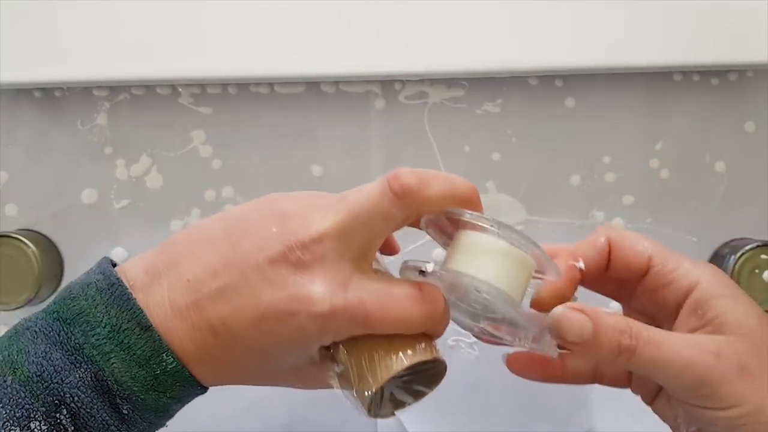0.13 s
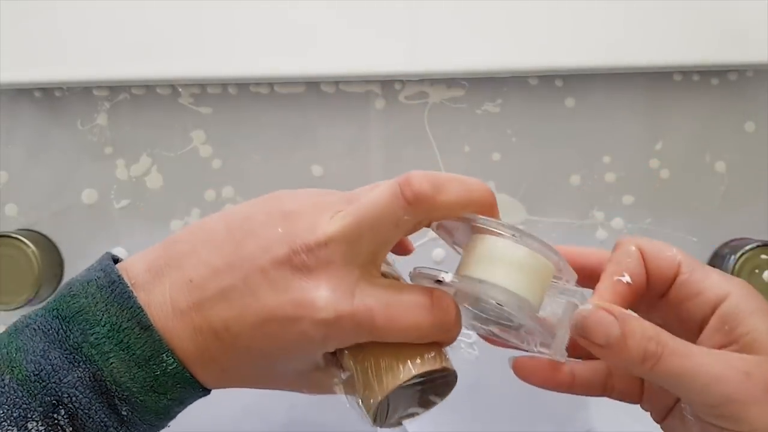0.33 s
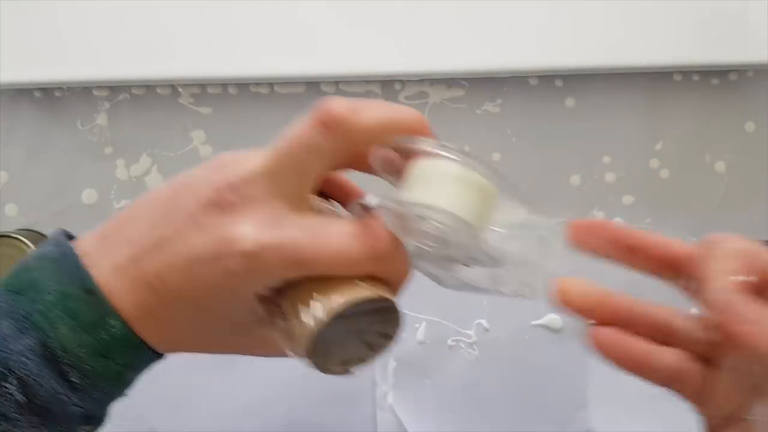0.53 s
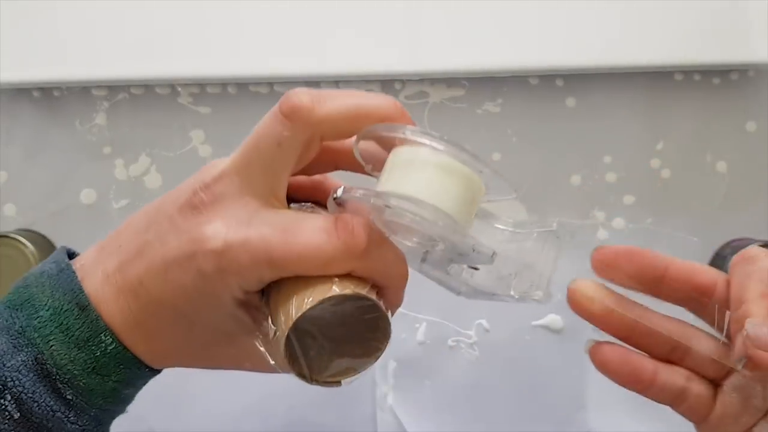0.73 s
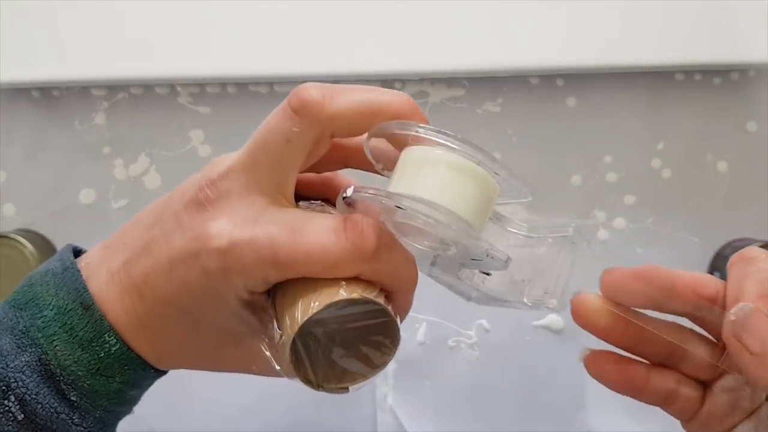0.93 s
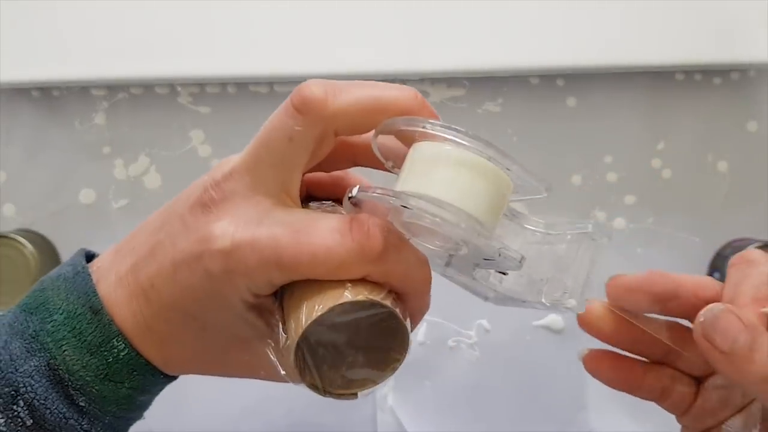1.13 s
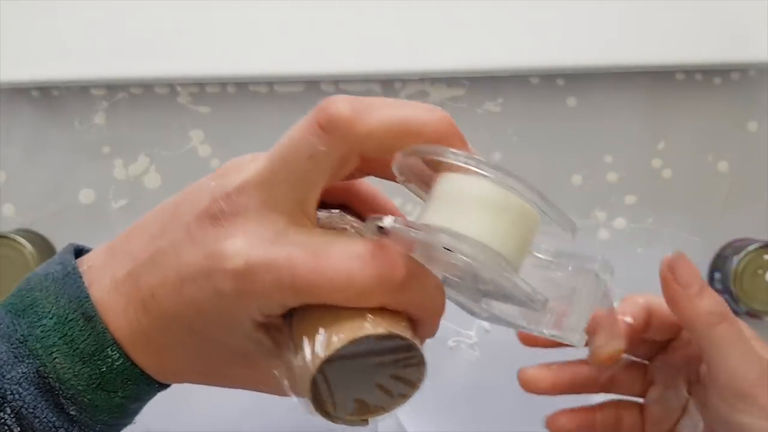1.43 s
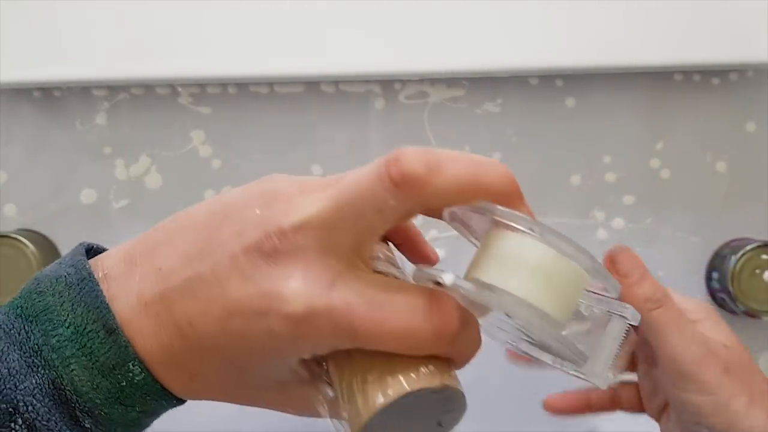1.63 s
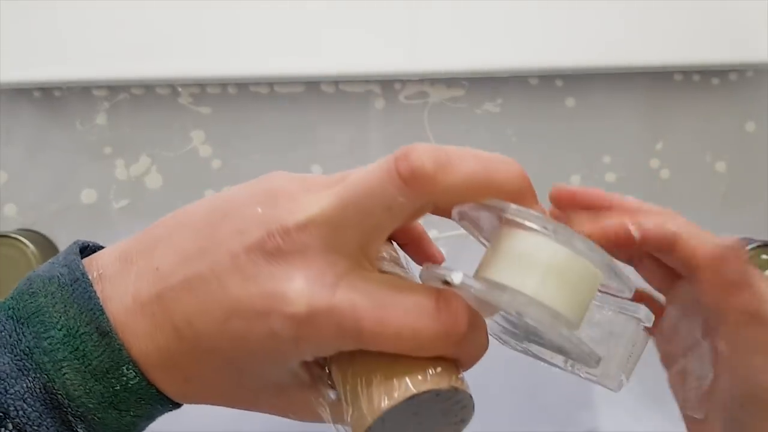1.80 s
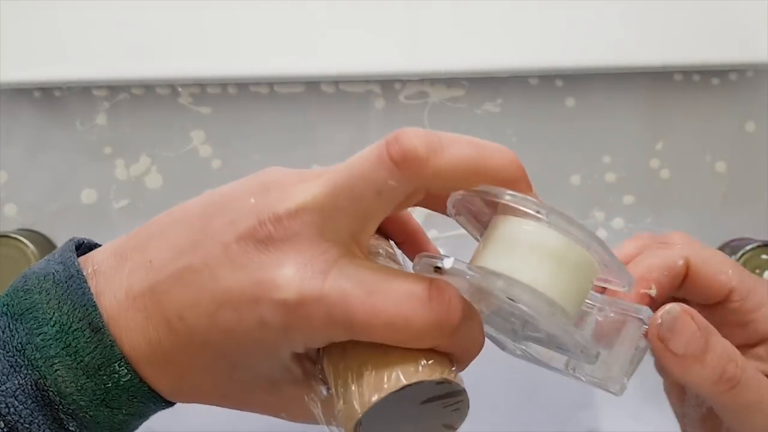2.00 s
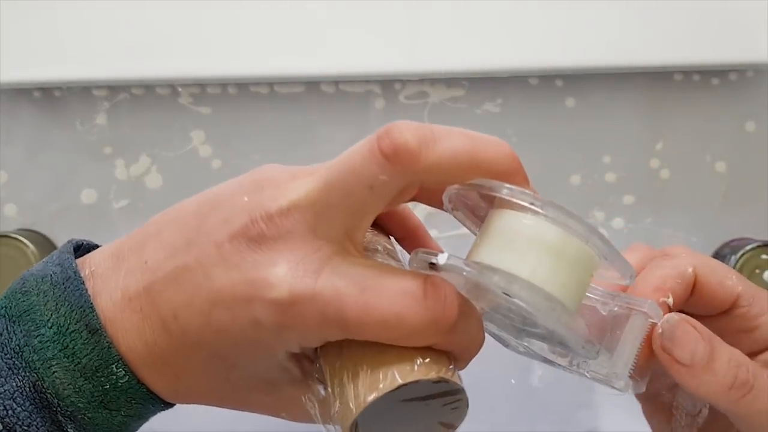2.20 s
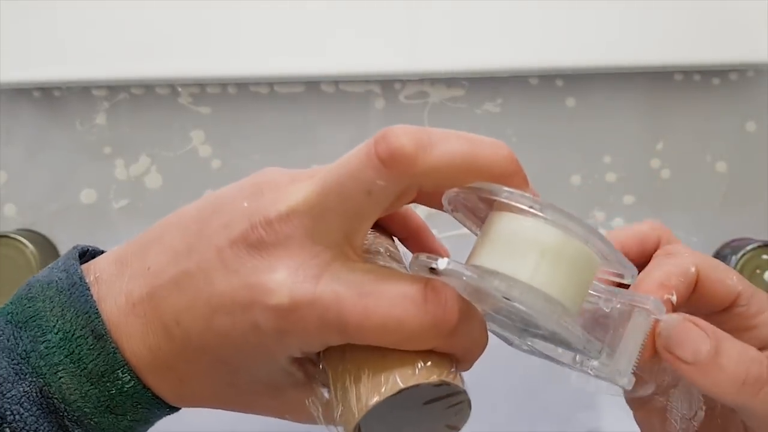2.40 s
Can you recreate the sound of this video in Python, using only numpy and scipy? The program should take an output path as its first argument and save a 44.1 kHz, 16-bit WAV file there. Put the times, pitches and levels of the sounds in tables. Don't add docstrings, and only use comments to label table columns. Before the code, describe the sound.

A bright, ringing rip of adhesive tape follows faint finger rubs and crisp clicks; afterwards only sparse light ticks, soft rubs and tiny squeaks remain. Close stereo phone microphone, stronger on the right, short indoor echo.

```python
import sys
import numpy as np
from scipy import signal
from scipy.fft import rfft, irfft, next_fast_len
from scipy.io import wavfile
from scipy.ndimage import map_coordinates

SR = 44100
rng = np.random.default_rng(int(sys.argv[2]) if len(sys.argv) > 2 else 0)


def unload_audio(sound):
    columns = np.transpose(np.atleast_2d(sound))
    steps = np.round(np.clip(columns, -1, 1) * 32767)
    wavfile.write(sys.argv[1], SR, steps.astype(np.int16))


def convert_level_to_amplitude(level_db):
    exponent = np.asarray(level_db, float) / 20
    return 10 ** exponent


N = 112454

# pitch in Hz, width in Hz, level in dB.
HUM_LINES = [(113.2, 18, -70.5), (155, 40, -74), (233, 29, -84), (310, 71, -83.5)]
# time in seconds, level in dB.
HUM_LOAD = [(0.0, -68.5), (0.07, -54), (0.11, -67), (0.15, -55.5), (0.93, -64.5), (0.96, -55.5),
            (1.66, -73.5), (1.7, -64.5), (1.77, -72.5), (1.81, -62), (1.92, -70.5), (1.95, -64.5),
            (2.01, -72), (2.04, -61), (2.24, -56), (2.27, -70), (2.31, -56), (2.55, -60.5)]
# frequency in Hz, density in dB per Hz.
RUMBLE_COLOUR = [(25, -11), (60, 4.5), (200, -15.5), (400, -21), (1000, -28.5), (2500, -39.5)]
# centre in seconds, level
# in dB, pitch in Hz, length in seconds.
BUMPS = [
    (0.006, -67, 300, 0.052),
    (0.247, -54, 130.4, 0.052),
    (0.781, -61.5, 203.3, 0.025),
    (1.44, -62, 155, 0.038),
    (2.297, -74.5, 300, 0.063),
    (2.435, -66.5, 310, 0.11),
]
# frequency in Hz, density in dB per Hz.
HISS_COLOUR = [(400, -28.5), (700, -11), (1500, -16.5), (3000, -17), (5000, -18), (8000, -24), (11000, -17),
               (16000, -11.5)]
# time in seconds, level in dB.
HISS_GAIN = [(0.7, -69), (0.818, -81), (0.992, -79), (1.42, -72.5), (1.678, -75.5), (2.254, -74),
             (2.55, -71)]
# start in seconds, length in seconds, level in dB, brightness in dB, shell ring in dB.
RUBS = [
    (-.03, 0.096, -59.5, -6, -26.5),
    (0.079, 0.16, -58, -2, -26),
    (0.788, 0.084, -70.5, -8, -8),
    (1.038, 0.084, -74, 3, 9.5),
    (1.101, 0.051, -73, 10, -15),
    (1.163, 0.097, -70, 4.5, -5),
    (1.269, 0.083, -58, -12.5, 8),
    (1.501, .085, -61.5, 6.5, 1.5),
    (1.919, 0.11, -68.5, -12, 0),
    (2.255, 0.175, -67, -5, 5),
]
# start in seconds, peak in dB, brightness in dB, shell ring in dB, burst length in seconds.
PICKS = [(0.0003, -55, 2, 8, 0.0015), (0.0504, -53.5, 1, -36, 0.00147), (0.094, -53.5, 8, -25, 0.0016),
         (0.106, -56, 6, -23, 0.001), (0.11, -60, 10, -22.5, .001), (0.13, -60, 12.5, -17.5, 0.00084),
         (0.144, -43.5, 7, -31, 0.00069), (0.1616, -36, 0, -28.5, 0.0032), (0.182, -39.5, 5.5, -20.5, .001),
         (0.186, -33, 0.5, -15.5, 0.002), (0.1904, -25, 0.5, 11.5, 0.003), (0.1939, -25.5, -0.5, 7, 0.002),
         (0.1986, -32.5, -2.5, 12.5, .003), (.208, -38, -3, 10.5, .002), (0.225, -42, -6, 9.5, .002),
         (0.2329, -38.5, 2.5, -10, .002), (0.2354, -14, 1.5, -5, 0.0028), (0.3416, -55.5, -5.5, 8, .004),
         (0.3986, -40, 0.5, -10, .002), (0.4, -13.5, -1, -3.5, 0.0032), (0.4143, -15, 4, -3, 0.0045),
         (0.4245, -19, 2, -1, 0.0017), (.428, -15.5, 3.5, -2, .004)]
# start in seconds, peak in dB, brightness in dB, shell ring in dB, burst length in seconds.
TICKS = [(0.7771, -47.5, 2, -6, 0.0013), (.842, -65, -10, -6, .001), (1.0498, -54.5, 4, -3, 0.0011),
         (1.0797, -56.5, 8, -18, 0.00092), (1.0896, -57, -12, -23, 0.0012), (1.2686, -41, -4, 13.5, 0.0018),
         (1.3298, -51, 3, -13, .0007), (1.4554, -65.5, 6, -4.5, 0.0011), (1.5645, -38, 9.5, 11.5, .001),
         (1.9184, -57.5, -21, 9.5, 0.0029), (2.146, -79, -5.5, 10.5, .002), (2.4636, -72, 16, -23, .001),
         (2.4803, -45.5, 16, -14.5, 0.0015)]
# frequency in Hz, density in dB per Hz.
TAPE_COLOUR = [(1500, -42), (2600, -11.5), (3300, -4.5), (5000, -7.5), (8000, -6.5), (12500, -2.5),
               (16000, -9)]
# start in seconds, level in dB, pitch in Hz, t60 in seconds.
PINGS = [(0.16, -45.5, 3300, 0.023), (0.19, -36, 8200, .015), (0.18, -40, 5750, .016),
         (.2365, -20, 8200, 0.017), (.24, -43, 8250, .17), (.236, -33, 3270, .02), (.2362, -44, 700, .15),
         (.24, -46.5, 4900, .17), (.236, -35.5, 1250, 0.024), (.3425, -54, 5800, .022),
         (.3418, -43, 1880, .06), (0.4, -25, 1250, 0.022), (.4003, -26.5, 2000, .03),
         (.4275, -25.5, 800, .03), (.43, -18.5, 7800, .012), (.527, -34, 798, 0.042),
         (1.31, -65.5, 1250, .06), (1.5645, -53, 5200, .02), (1.9184, -71, 1380, 0.041)]
# start in seconds, length in seconds, level in dB, pitch in Hz, rise in Hz per second.
SQUEAKS = [
    (2.257, .07, -75, 1520, 2500),
    (2.29, .115, -71, 1760, 200),
    (2.28, .065, -75, 7900, 3000),
    (2.315, .07, -79, 4500, 500),
    (1.515, .05, -67, 4700, 2000),
]
# time in seconds, force in dB, brightness in dB, shell ring in dB, low tug in dB, hub ring in dB.
PULL = [
    (.422, -44, -1, -3.5, -6.5, -3),
    (0.424, -15, 4, -0.5, -4, -0.5),
    (.45, -8, 4.5, -4.5, -5.5, 0),
    (0.488, -8.5, 7.5, -7.5, -6, 3),
    (.499, -8, 7.5, -13.5, -5.5, -16.5),
    (0.526, -9.5, 4, 1, -2.5, -10),
    (0.546, -8.5, 2.5, -8, 3, 3),
    (0.563, -14, 1, -0.5, 6, 2),
    (0.57, -36, 6, 7.5, -5.5, 7.5),
]
# pitch in Hz, width in Hz, level in dB.
SHELL_MODES = [(1416, 740, -18.5), (1577, 110, -11), (1762, 41, -3.5), (1933.4, 49, 1.5), (2130, 130, -7),
               (2463, 220, -15), (4610, 350, -20.5), (5250, 400, -21.5), (8200, 670, -21)]
# pitch in Hz, width in Hz, level in dB.
HUB_MODES = [(1787, 44, 15)]
# pitch in Hz, width in Hz, level in dB.
RATTLE_MODES = [(480, 250, -12), (740, 300, -8), (1250, 300, -2.5)]
# pitch in Hz, width in Hz, level in dB.
DRUM_MODES = [(226, 120, -12), (323, 120, -9)]
# frequency in Hz, likeness from 0 to 1.
NEAR_ALIKE = [(100, .95), (1800, .95), (3000, .5), (6000, .2), (15000, .1)]
# frequency in Hz, left minus right in dB.
NEAR_SIDE = [(200, -6), (1500, -9), (3000, -8.5), (5000, -15), (7000, -17.5), (9000, -2.5), (11000, -6.5),
             (15000, -10.5)]
# frequency in Hz, likeness from 0 to 1.
ROOM_ALIKE = [(200, .9), (1800, .75), (4000, .1)]
# frequency in Hz, t60 in seconds.
ROOM_T60 = [(200, 0.087), (2000, 0.29), (8000, 0.25), (15000, 0.12)]

TABLE_GAP_S, TABLE_DB, TABLE_T60 = .0055, -7.5, 0.051
ROOM_GAP_S, ROOM_DB = .008, -10.5
ECHO_LEFT_DB = -9.5


def unit(x):
    return x / np.sqrt(np.mean(x ** 2) + 1e-20)


def along(points, hz):
    f, v = np.transpose(points)
    return np.interp(np.log(hz + 1), np.log(f + 1), v)


def wobble(rate):
    knots = rng.standard_normal(int(N * rate / SR) + 4)
    return map_coordinates(knots, [np.arange(N) * rate / SR])


def faded(t, length, edge):
    return np.clip(np.minimum(t, length - t) / edge, 0, 1)


def filtered(x, response):
    m = next_fast_len(N + SR // 2)
    return irfft(rfft(x, m) * response(np.fft.rfftfreq(m, 1 / SR)), m)[..., :N]


def resonances(modes):
    def response(f):
        total = 0
        for k, (hz, width, db) in enumerate(modes):
            total = total + (-1) ** k * convert_level_to_amplitude(db) * 1j * f * width / (hz * hz - f * f + 1j * f * width)
        return total
    return response


def pair(envelope, colour, alike):
    def mid_side(hz):
        turn = np.arccos(np.clip(along(alike, hz), -1, 1)) / 2
        return colour(hz) * [np.cos(turn), np.sin(turn)]
    mid, side = filtered(envelope * rng.standard_normal((2, N)), mid_side)
    return np.array([mid + side, mid - side])


def narrow(t, hz, rise, blur):
    a, b = [map_coordinates(k, [t * blur * hz], mode="wrap") for k in rng.standard_normal((2, 400))]
    phase = 2 * np.pi * (hz + rise * t / 2) * t
    return a * np.cos(phase) + b * np.sin(phase)


def hum():
    alike = [(50, .93), (300, 0.47), (1200, 0.33)]
    t = np.arange(N) / SR
    load_db = np.interp(t, *np.transpose(HUM_LOAD))
    drift = 0.9 * (wobble(5.6) + 2 * wobble(2.0))
    out = convert_level_to_amplitude(load_db + 0.5) * np.sin(2 * np.pi * 57.4 * t + drift)
    gain_db = np.interp(t, *np.transpose(HISS_GAIN))
    rumble_db = 0.64 * wobble(2.0) + .4 * (gain_db + 75)
    rumble = pair(convert_level_to_amplitude(rumble_db), lambda hz: convert_level_to_amplitude(along(RUMBLE_COLOUR, hz)), alike)
    out = out + convert_level_to_amplitude(-67) * unit(rumble)
    for hz, width_hz, db in HUM_LINES:
        line = resonances([(hz, width_hz, 0)])
        sway_db = 0.26 * (load_db - load_db.mean())
        out = out + convert_level_to_amplitude(db + sway_db) * unit(pair(1, lambda f: line(f) ** 2, alike))
    for s, db, hz, length in BUMPS:
        swell = convert_level_to_amplitude(db) * np.exp(-(2 * (t - s) / length) ** 2)
        out = out + swell * np.sin(2 * np.pi * hz * t + 2.6 * wobble(28))
    return out * convert_level_to_amplitude([[-3.25], [3.25]])


def hiss():
    gain_db = 3 + np.interp(np.arange(N) / SR, *np.transpose(HISS_GAIN))
    return convert_level_to_amplitude(gain_db) * unit(pair(1, lambda hz: convert_level_to_amplitude(along(HISS_COLOUR, hz)), [(1000, 0.0012)]))


def rubs():
    t = np.arange(N) / SR
    grain = convert_level_to_amplitude(1.8 * (wobble(130) + wobble(40)))
    out = np.zeros((4, N))
    for s, length, db, bright_db, ring_db in RUBS:
        parts_db = np.array([[0], [bright_db], [ring_db], [-20]])
        out += faded(t - s, length, .035) ** 2 * convert_level_to_amplitude(db + parts_db)
    return grain * out


def ticks():
    out, t = np.zeros((4, N + 2000)), np.arange(2000) / SR
    snap = 1 + 1.2 * np.exp(-t / .00012)
    for s, db, bright_db, ring_db, length in PICKS + TICKS:
        shape = convert_level_to_amplitude(db - 60 * np.maximum(t - length, 0) / 0.0069) * snap
        tug_db = -7 + 0.22 * (db + 14.5)
        start = round(s * SR)
        out[:, start:start + len(t)] += shape * convert_level_to_amplitude([[0], [bright_db], [ring_db], [tug_db]])
    return out[:, :N]


def crackle(dull, bright, alike):
    top = lambda hz: 1 / (1 + (7900 / (hz + 1)) ** 8)
    low = pair(dull, lambda hz: convert_level_to_amplitude(along(TAPE_COLOUR, hz)) * np.sqrt(1 - top(hz)), alike)
    return low + pair(bright, lambda hz: convert_level_to_amplitude(along(TAPE_COLOUR, hz)) * np.sqrt(top(hz)), alike)


def scattered(envelope, hz):
    t = np.arange(SR // 2) / SR
    energy = 0
    for gap, db, t60 in [(TABLE_GAP_S, TABLE_DB, TABLE_T60), (ROOM_GAP_S, ROOM_DB, along(ROOM_T60, hz))]:
        fade = (t > gap) * convert_level_to_amplitude(-60 * (t - gap) / t60) ** 2
        energy = energy + convert_level_to_amplitude(db) ** 2 * fade / fade.sum()
    return np.sqrt(np.abs(signal.fftconvolve(envelope ** 2, energy)[:N]))


def echoed(x, tail, gap_s, db):
    tail = np.pad(tail / np.linalg.norm(tail[0]), ((0, 0), (round(gap_s * SR), 0)))
    return convert_level_to_amplitude([[db + ECHO_LEFT_DB], [db]]) * signal.fftconvolve(x[1:], tail, axes=1)[:, :N]


def table(x):
    t = np.arange(2000) / SR
    tail = pair(1, np.ones_like, ROOM_ALIKE)[:, :len(t)] * convert_level_to_amplitude(-60 * t / TABLE_T60)
    return echoed(x, tail, TABLE_GAP_S, TABLE_DB)


def room(x):
    noise = pair(1, np.ones_like, ROOM_ALIKE)[:, :SR // 2]
    hz, frames, z = signal.stft(noise, SR, nperseg=256)
    fade = convert_level_to_amplitude(-60 * frames / along(ROOM_T60, hz)[:, None])
    return echoed(x, signal.istft(z * fade, SR, nperseg=256)[1], ROOM_GAP_S, ROOM_DB)


def pings():
    out, t = np.zeros(N + SR), np.arange(SR // 5) / SR
    for s, db, hz, t60 in PINGS:
        shape = convert_level_to_amplitude(db - 60 * t / t60) * (1 - np.exp(-2000 * t))
        out[round(s * SR):][:len(t)] += shape * narrow(t, hz, 0, .09)
    for s, length, db, hz, rise in SQUEAKS:
        shape = convert_level_to_amplitude(db - 2.5) * faded(t, length, .012)
        out[round(s * SR):][:len(t)] += shape * narrow(t, hz, rise, .14)
    return out[:N]


def pull():
    slips_per_s, scatter, size_db, slip_t60, bed = 820, .45, 3, 0.0014, 0.22
    s, *columns = np.transpose(PULL)
    t = np.arange(N) / SR
    force_db, bright_db, ring_db, tug_db, hub_db = [np.interp(t, s, c) for c in columns]
    draw = rng.standard_normal((400, 2))
    gaps = np.exp(scatter * draw[:, 0]) / slips_per_s
    at = (SR * (s[0] + np.cumsum(gaps))).astype(int)
    slips = np.bincount(at, convert_level_to_amplitude(size_db * np.tanh(draw[:, 1])), N)[:N]
    slips = np.convolve(slips, convert_level_to_amplitude(-60 * t[:300] / slip_t60))[:N] + bed
    force = convert_level_to_amplitude(force_db) * (t > s[0]) * (t < s[-1])
    return force * slips * convert_level_to_amplitude([0 * t, bright_db, ring_db, tug_db, hub_db])


def shell_response(hz):
    return resonances(SHELL_MODES)(hz) * (1j * hz / (1302 + 1j * hz)) ** 3 * 2


def place(x):
    half = np.array([[.5], [-.5]])
    lag_s = .00003
    return filtered(x, lambda hz: convert_level_to_amplitude(half * along(NEAR_SIDE, hz)) * np.exp(-2j * np.pi * hz * half * lag_s))


def dispenser():
    rip, touch = pull(), ticks() + rubs()
    dull, bright, ring = rip[:3] + touch[:3]
    shell = convert_level_to_amplitude(8.0) * pair(ring, shell_response, NEAR_ALIKE)
    hub = pair(convert_level_to_amplitude(-4) * rip[4] + touch[3], resonances(HUB_MODES), NEAR_ALIKE)
    rattle = pair(convert_level_to_amplitude(-6) * rip[0], resonances(RATTLE_MODES), NEAR_ALIKE)
    drum = pair(rip[3] + convert_level_to_amplitude(-5.5) * touch[3], resonances(DRUM_MODES), NEAR_ALIKE)
    body = place(shell + hub + rattle + drum)
    rings = place(pings())
    near = place(crackle(dull, bright, NEAR_ALIKE))
    far = crackle(scattered(dull, 5000), scattered(bright, 12000), ROOM_ALIKE)
    far = far * convert_level_to_amplitude([[5.5 + ECHO_LEFT_DB], [4]])
    return near + far + body + rings + table(body + rings) + convert_level_to_amplitude(-4) * room(body)


def scene():
    return dispenser() + hum() + hiss()


def band_limit(x):
    return signal.sosfilt(signal.butter(12, 17100, fs=SR, output="sos"), x)


def record(dry):
    soft = dry / (1 + np.abs(dry / .68) ** 6) ** (1 / 6)
    mix = filtered(soft, lambda hz: 1 / (1 + (hz / 15850) ** 150) + 0.015)
    return band_limit(mix)


dry = scene()
out = record(dry)
unload_audio(out)
```